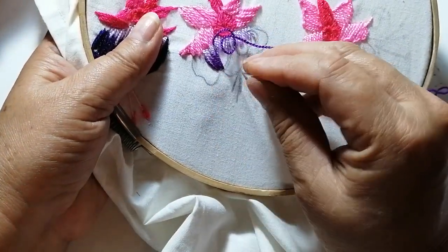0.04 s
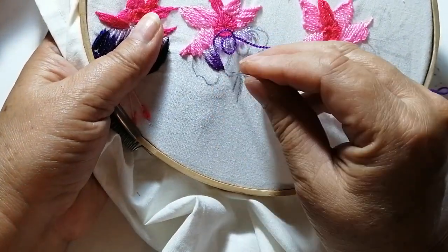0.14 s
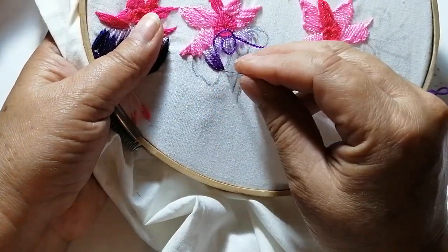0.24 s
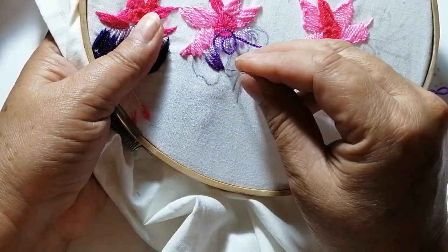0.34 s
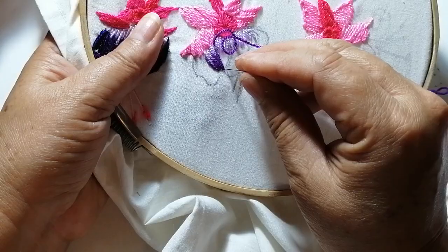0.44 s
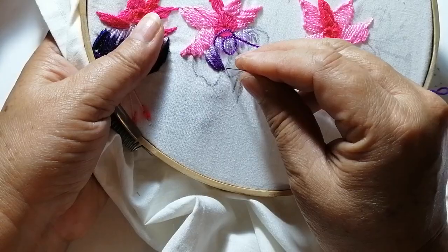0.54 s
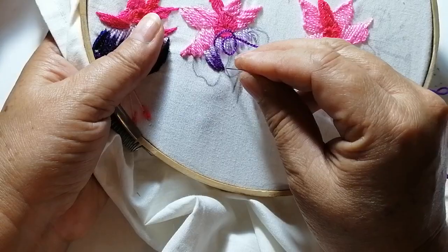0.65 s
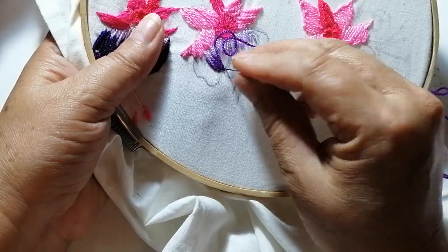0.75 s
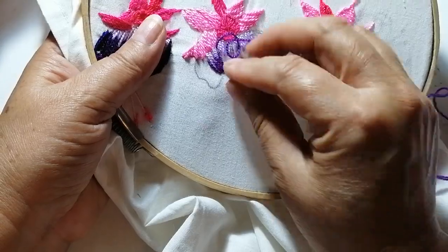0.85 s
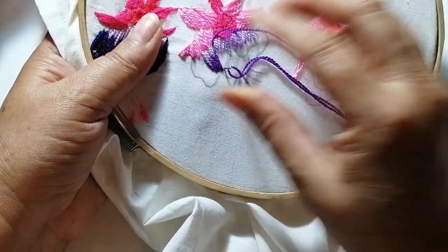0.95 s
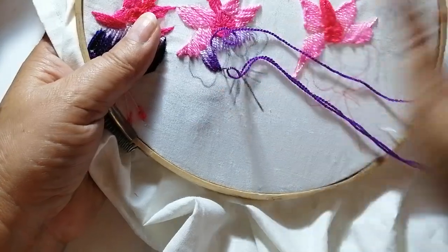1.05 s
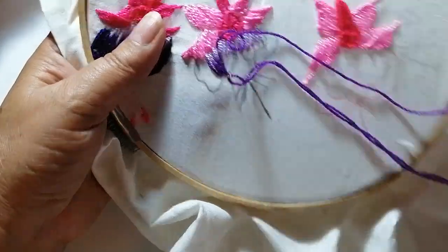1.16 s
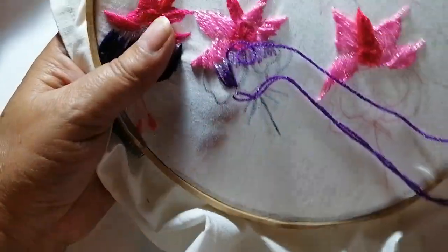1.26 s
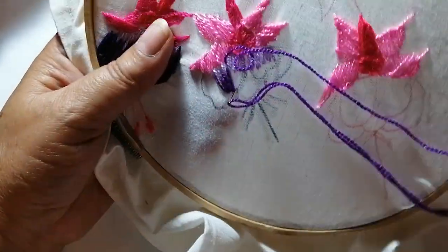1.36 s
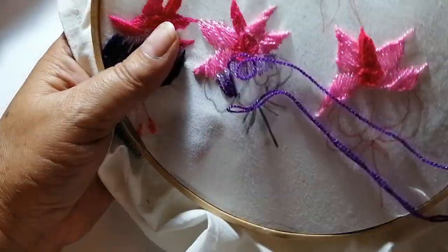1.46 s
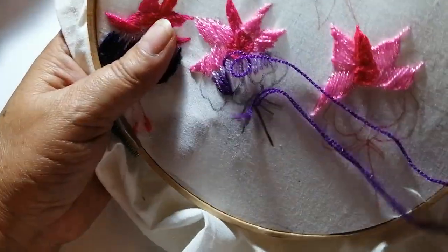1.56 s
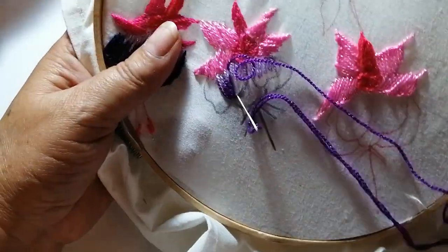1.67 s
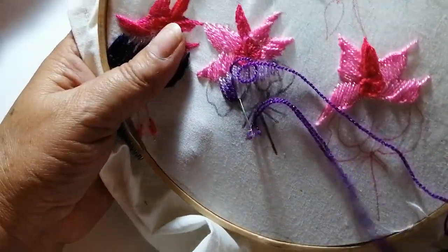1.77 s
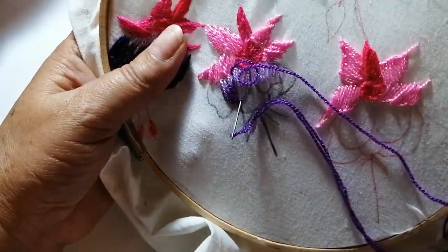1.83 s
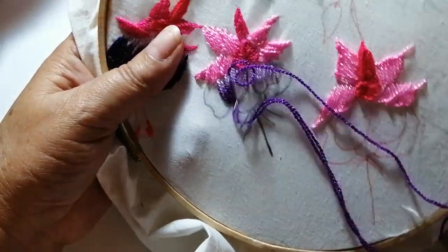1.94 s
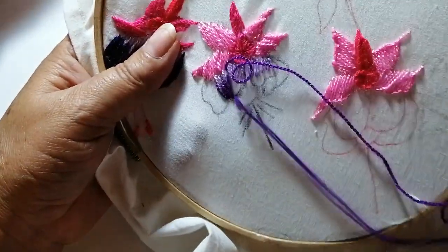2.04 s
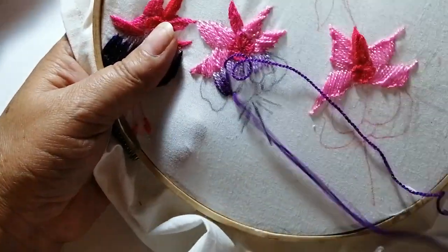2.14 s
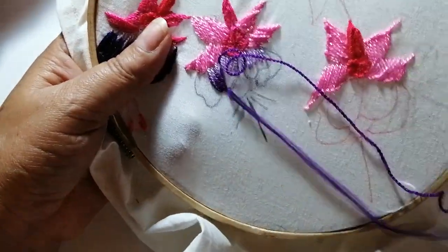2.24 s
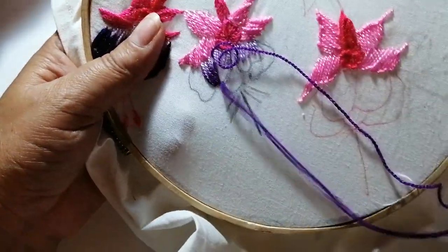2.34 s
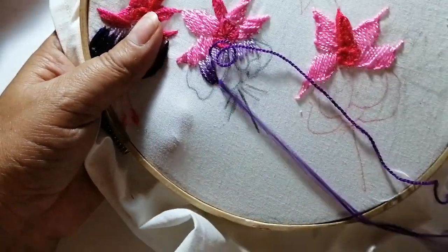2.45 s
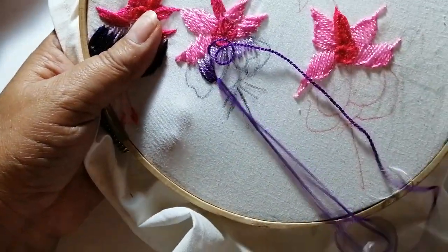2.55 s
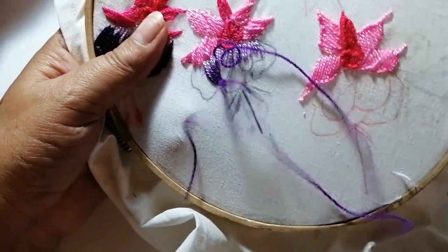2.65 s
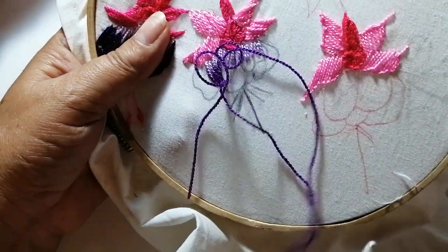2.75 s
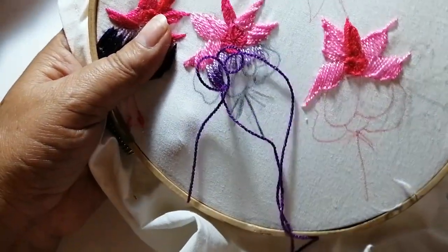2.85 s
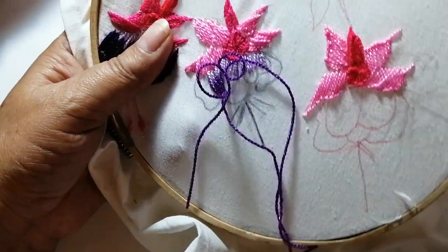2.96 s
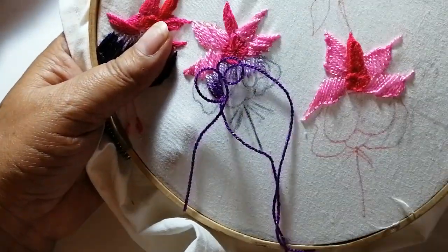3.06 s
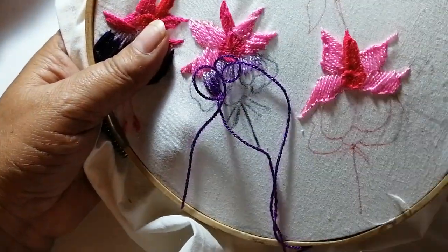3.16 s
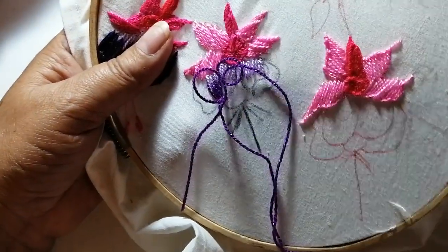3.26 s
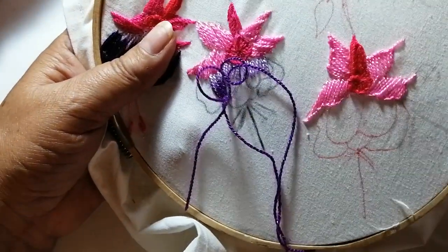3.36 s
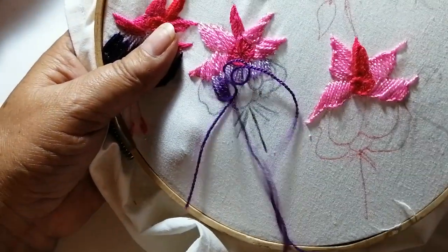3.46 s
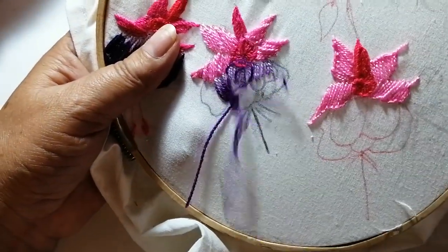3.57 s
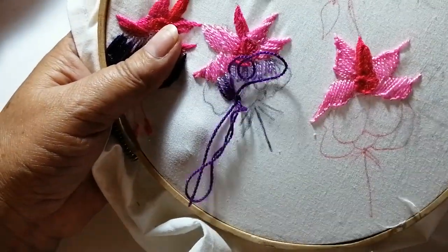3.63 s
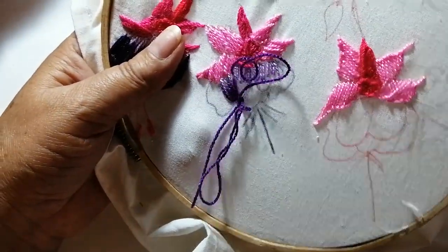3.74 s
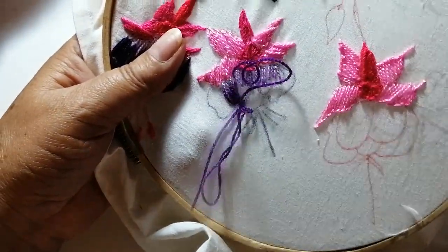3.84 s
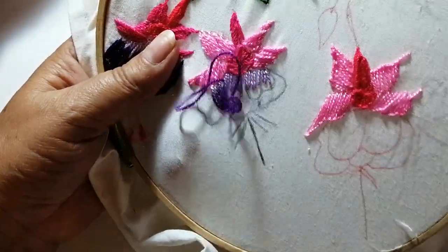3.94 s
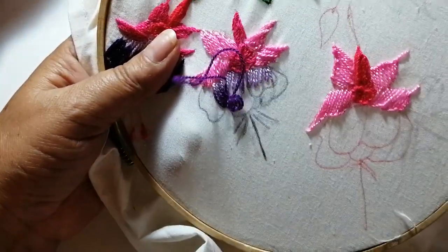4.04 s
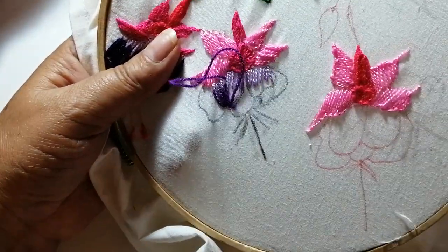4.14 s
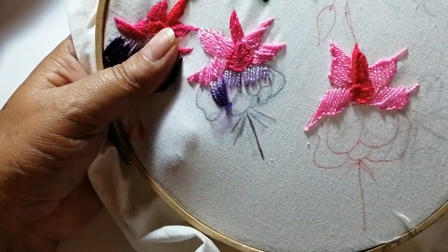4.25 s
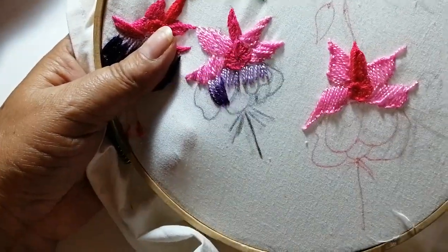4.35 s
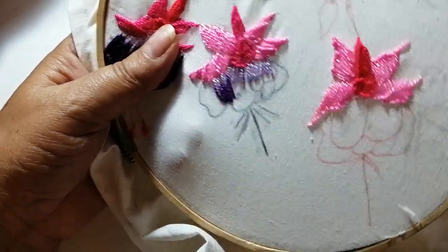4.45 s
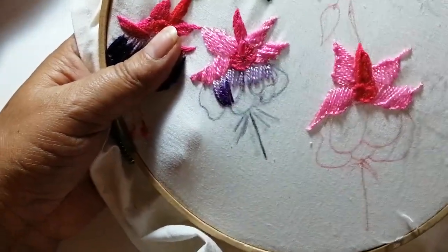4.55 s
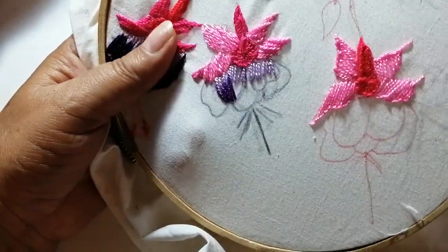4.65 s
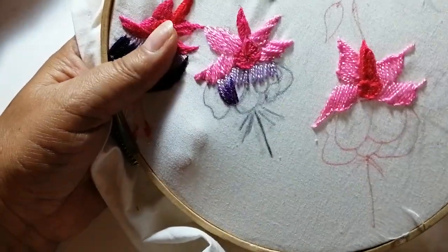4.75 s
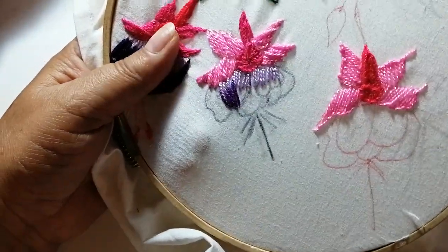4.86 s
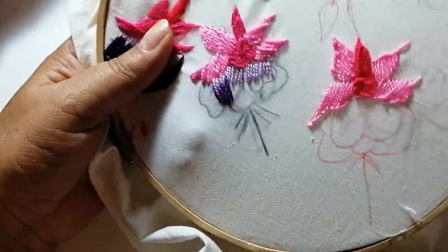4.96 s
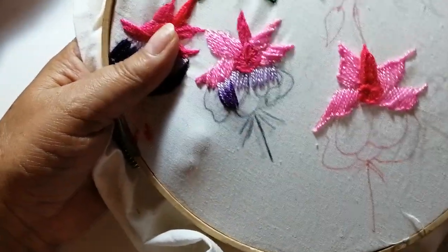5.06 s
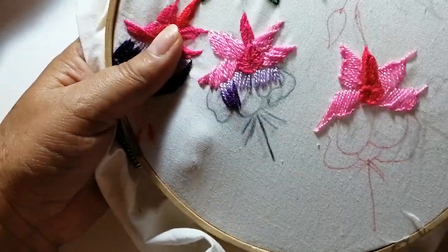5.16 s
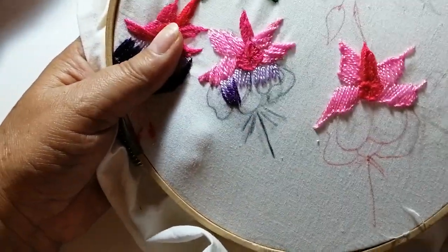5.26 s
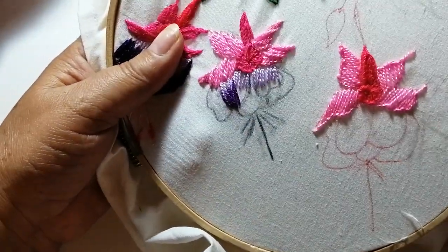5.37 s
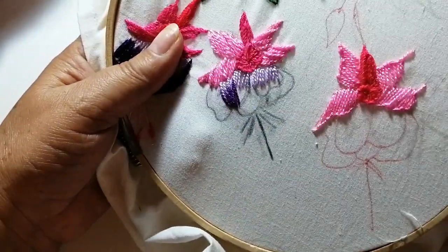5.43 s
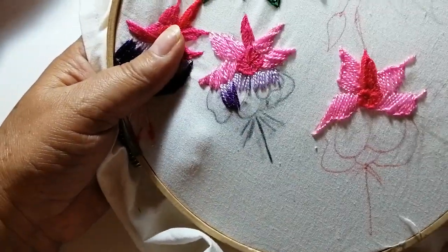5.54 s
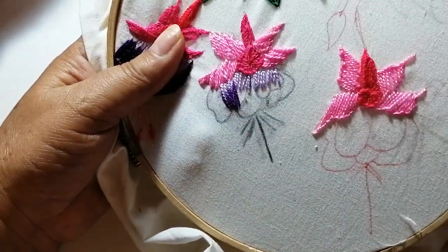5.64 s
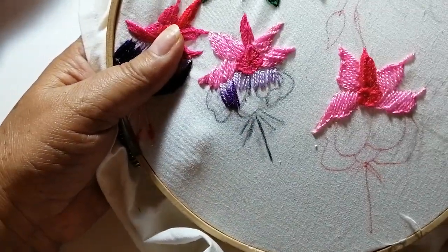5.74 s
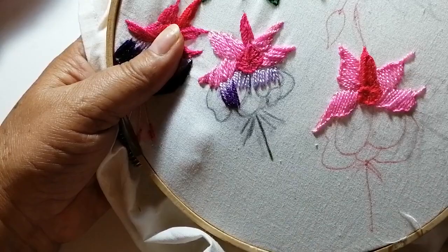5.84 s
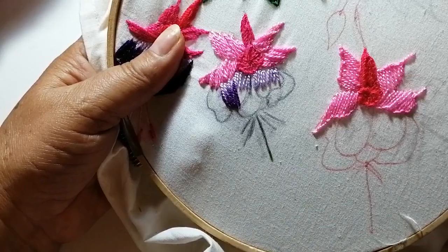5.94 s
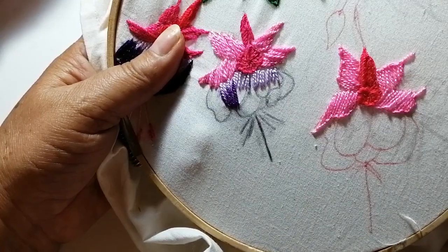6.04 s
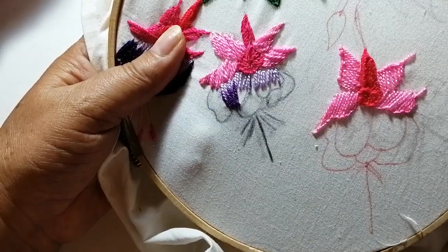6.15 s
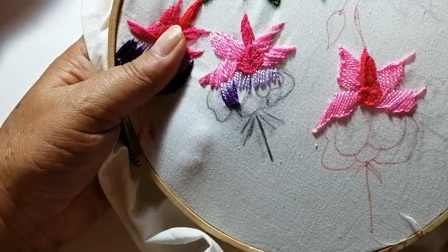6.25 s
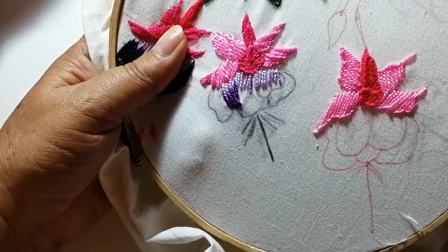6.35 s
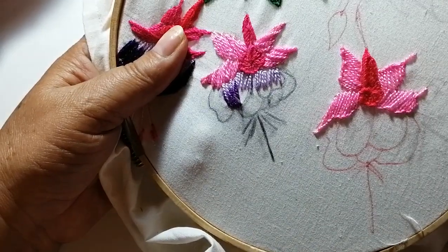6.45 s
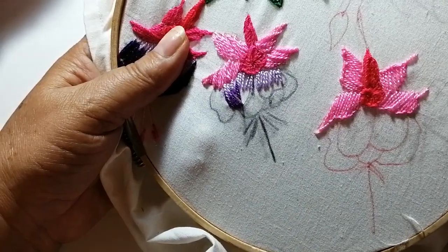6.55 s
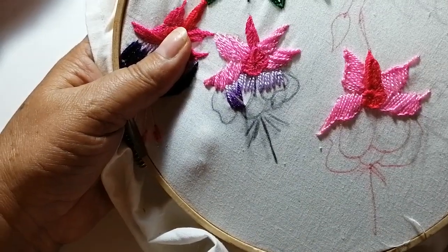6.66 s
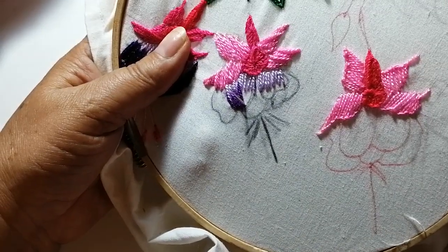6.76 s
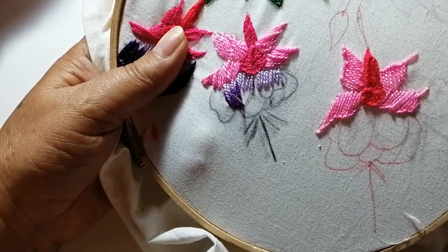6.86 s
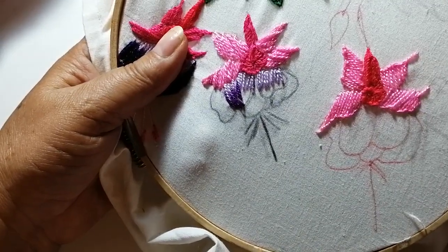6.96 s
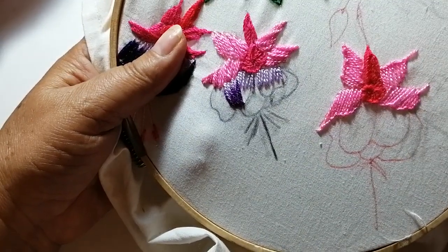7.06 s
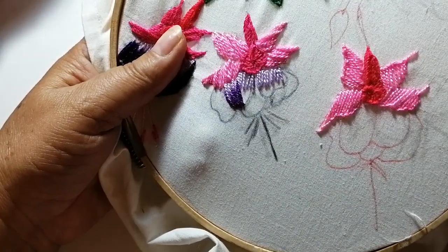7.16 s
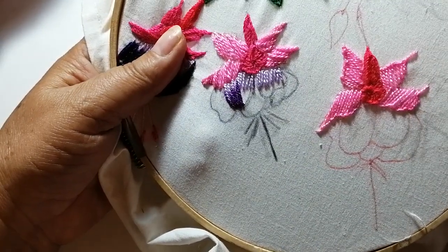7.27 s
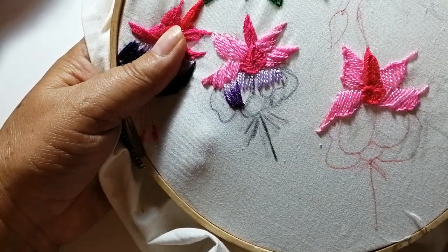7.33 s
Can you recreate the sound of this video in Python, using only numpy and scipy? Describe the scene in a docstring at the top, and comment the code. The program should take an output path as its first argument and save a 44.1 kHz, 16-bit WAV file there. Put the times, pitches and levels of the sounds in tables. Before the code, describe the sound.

Thread rasps through taut embroidery cloth in three pulls, with drum-like snaps and light needle pricks over a low hum.

```python
"""Close-up hand embroidery on cotton stretched in a hoop, over an appliance's low hum in a small room.
First fingers brush the cloth and the needle pricks it lightly. From 2 s the thread is drawn through in
three pulls, rasping as it slips; the taut cloth, a small drum, snaps when the needle's eye or a loop
pops through, hardest just before the third pull at 4.1 s. The fingers brush again, at 5.5 s the needle
pierces the weave, and one last prick leaves only the hum and the room."""
import sys
import numpy as np
from scipy import signal
from scipy.fft import rfft, irfft
from scipy.io import wavfile

SR = 44100
rng = np.random.default_rng(int(sys.argv[2]) if len(sys.argv) > 2 else 0)


def unload_audio(sound):
    """Save the sound as a 16-bit wav file, at the path given as the first command line argument."""
    columns = np.transpose(np.atleast_2d(sound))
    # keep every value between -1 and 1, then stretch to whole-number steps
    steps = np.round(np.clip(columns, -1, 1) * 32767)
    wavfile.write(sys.argv[1], SR, steps.astype(np.int16))


N = 326340
T = np.arange(N) / SR
HZ = np.fft.rfftfreq(N, 1 / SR)


# The arm speeds up, then eases off: (start [s], fastest [s], stop [s], top rasp [dB], build-up [dB],
# ease-off [dB], brightness [dB], brightening [dB/s], hoop tug [dB], slackening [dB/s], hiss [dB])
PULLS = [(2.008, 2.15, 2.684, -39, 4, 1.5, -.5, 2, -8.5, 38, -61.5),
         (3.470, 3.612, 3.728, -39.3, 12.5, 12.5, -8.5, 68, -8.5, 2, -62),
         (4.09, 4.26, 4.430, -49, 9, 2.5, 1.5, -5, -5, 40, -78.5)]
# How the thread sits in each pull: (rasp shelf edge [Hz], shelf gain [dB], ring in the hiss [dB])
THREAD_GRIPS = [(1300, 0, -13), (2195, -5.5, 10), (1650, -4.5, -11)]
# Tone of the slipping thread, the tugged hoop and the fibres: (frequency [Hz], level [dB])
RASP_EQ = [(100, -31), (250, -14.5), (400, -4), (470, -2.3), (680, 1.5), (900, -6), (1150, -10.5),
           (1420, -14), (1700, -18.5), (2200, -28), (3200, -32), (4500, -39), (9000, -53), (14000, -66)]
TUG_EQ = [(30, -29), (80, 2.5), (140, -8), (240, 2), (400, -3.5), (900, -59.5)]
FIBRE_EQ = [(800, -15.5), (2500, 3), (4000, -1.5), (5500, -0.5), (7000, -3.5), (8300, -5), (9600, 1.5),
            (11000, -4), (12500, -11.5), (15000, -18)]

def thread_pulls(attack_s=.027, release_s=.033, bright_hz=1100, trim_db=-1, room_db=-7,
                 hiss_build_db=7, hiss_sag=.8, hiss_linger_s=.012, hiss_release_s=.05):
    """Twisted thread slips through the weave and drives the cloth; its fibres hiss at the hole."""
    friction = tint(stick_slip(per_s=750, spread_db=3, smooth=.4), RASP_EQ) * amp(1.26 * drift(18))
    tug = tint(rng.standard_normal(N), TUG_EQ)
    fibres = tint(stereo(rng.standard_normal((2, N)), DIFFUSE_IMAGE), FIBRE_EQ) * amp(1.3 * drift(120))
    body, hiss = np.zeros(N), np.zeros((2, N))
    for pull, (edge_hz, shelf_db, ring_db) in zip(PULLS, THREAD_GRIPS):
        start, fastest, stop, db, build_db, ease_db = pull[:6]
        bright_db, brightening, tug_db, slackening, hiss_db = pull[6:]
        age, trip_ms = np.clip(T, start, stop) - start, round_trip_ms(fastest)
        slow = np.interp(T, [start, fastest], [1, 0])
        eased = np.interp(T, [fastest, stop], [0, 1])

        shelf = 1 + (amp(shelf_db) - 1) * (1 - lowpass(HZ, edge_hz, 16))
        rasp = unit(cloth(irfft(rfft(friction) * shelf, N), trip_ms))
        treble = irfft(rfft(rasp) * (1 - lowpass(HZ, bright_hz, 6)), N)
        rasp += (amp(bright_db + brightening * age) - 1) * treble
        drive = rasp + amp(tug_db - slackening * age) * tug
        moving = swell(start, attack_s, release_s, stop - start)
        body += moving * amp(db - build_db * slow - ease_db * eased) * drive

        # The loose end still hisses through the hole after the tension is gone.
        hissing = swell(start, attack_s, hiss_release_s, stop - start + hiss_linger_s)
        hiss_gain = amp(hiss_db - (build_db + hiss_build_db) * slow - hiss_sag * ease_db * eased)
        ringing = unit(np.array([cloth(side, trip_ms) for side in fibres]))
        hiss += hissing * hiss_gain * unit(fibres + amp(ring_db) * ringing)
    return amp(trim_db) * (close_mics(body) + amp(room_db) * room(body)) + hiss


# Snags letting go: (time [s], level [dB], sharpness [Hz], needle tick [dB], boom [dB], cloth ring [dB])
SNAPS = [(2.0220, -12.3, 2080, -35, -19, -8), (2.478, -35, 1000, -18, -30, -2),
         (3.544, -32, 900, -20, -33, 0), (3.5770, -30.5, 1000, -14, -16, -5),
         (3.6120, -28, 1420, -13, -32, -18), (3.6309, -18, 1700, -13, -25, -19),
         (3.9435, -7, 5000, -1.5, -19, -35), (4.0926, -28, 784, -19, -39, 1.5),
         (4.2563, -30, 1150, -6, -22, 5.5), (4.432, -44, 1500, -10, -30, -3)]

def thread_snaps():
    """The thread snags the cloth and pops free; a harder snap is wetter."""
    return sum(cloth_hit(s, db, sharp_hz, tick_db, boom_db, ring_db, room_db=-3.8 + .2 * db)
               for s, db, sharp_hz, tick_db, boom_db, ring_db in SNAPS)


# Needle touches: (time [s], level [dB], sharpness [Hz], needle tick [dB], cloth ring [dB])
PRICKS = [(0.7825, -56, 2500, -6, -20), (0.950, -57.5, 2000, -10, -12), (1.2178, -50.5, 1900, 18, -34),
          (5.0267, -53.5, 2000, 6, -3), (5.5243, -44.5, 3300, 3, -5.5), (5.8705, -31.8, 3300, 6, -7.5)]

def needle_pricks():
    """The point is too light to move the cloth far: thin ticks with hardly any low end."""
    return sum(cloth_hit(s, db, sharp_hz, tick_db, -42, ring_db, room_db=-5.5, low_cut_hz=350)
               for s, db, sharp_hz, tick_db, ring_db in PRICKS)


def needle_piercing(start_s=5.548, length_s=.053, jitter_s=.0006, strands=8):
    """The needle slips past strand after strand: faster, louder and sharper as it goes in."""
    depth = np.linspace(0, 1, strands) ** .8
    times = start_s + length_s * depth + jitter_s * rng.standard_normal(strands)
    return sum(cloth_hit(s, db=-43.5 + 5.5 * d, sharp_hz=2600, tick_db=4 + 8.5 * d,
                         boom_db=-24, ring_db=-9.5, room_db=-7.5) for s, d in zip(times, depth))


# Tone of one hit: (frequency [Hz], level [dB])
HIT_EQ = [(30, -38), (120, -10), (300, -0.5), (650, 5), (1300, -6.5), (2100, -12), (3200, -14.5),
          (4300, -22), (5800, -28), (7200, -27.5), (8300, -28.5), (9500, -20.5), (12000, -40),
          (15000, -50.5)]
# Low drum modes of the whole hoop: (frequency [Hz], level [dB], t60 [s])
DRUM_MODES = [(88, -2.5, 0.16), (162, -11, 0.16), (239.5, -3.5, 0.12), (349.7, -6.5, 0.14)]

def cloth_hit(s, db, sharp_hz, tick_db, boom_db, ring_db, room_db, low_cut_hz=0,
              size=16384, tick_s=.0006, ring_t60=.042):
    """One release kicks the cloth: a pulse with a gritty steel tick, a brief ring, a boom and reverb."""
    hz, t = np.fft.rfftfreq(size, 1 / SR), np.arange(size) / SR
    trip_ms = round_trip_ms(s)
    colour = amp(read(HIT_EQ, hz)) / np.sqrt(1 + (low_cut_hz / (hz + 1)) ** 6)
    soft = lowpass(hz, sharp_hz, 8)  # crossover: pulse below, tick above
    pulse = impulse(colour * np.sqrt(soft))
    click = impulse(colour * np.sqrt(1 - soft) * hz / (hz + 1500))
    grit = rng.standard_normal(size) * np.exp(-t / tick_s)
    tick = signal.fftconvolve(click, grit / np.linalg.norm(grit))[:size]
    hit = cloth(pulse + amp(tick_db) * tick, trip_ms)
    hit /= abs(hit).max()

    onset = 1 - np.exp(-(t / .003) ** 2)  # the modes take a moment to build up
    ring_hz = 3500 / trip_ms  # three and a half cycles a round trip
    ring = amp(ring_db - 60 * t / ring_t60) * np.cos(2 * np.pi * ring_hz * t)
    boom = sum(amp(level - 60 * t / t60) * np.cos(2 * np.pi * f * t) for f, level, t60 in DRUM_MODES)
    direct = hit + onset * (ring + amp(boom_db) * boom)
    fader = amp(db) * np.minimum(np.linspace(10, 0, size), 1)
    return close_mics(place(s, fader * direct)) + place(s, fader * amp(room_db) * room(hit))


# How much of a wave the hoop sends back: (frequency [Hz], share [0-1])
RIM_REFLECTION = [(100, 0.4), (280, 0.1), (470, 0.57), (670, 0.53), (900, 0.33), (1400, 0), (2500, 0.14)]
# Narrow resonances of hoop and needle: (frequency [Hz], width [Hz], boost [dB])
RESONANCES = [(1380, 110, 6), (1934, 77, 6), (2760, 256, 6.5), (3680, 150, 6.5), (7020, 750, 7.5),
              (9500, 1300, 3)]

def cloth(x, trip_ms):
    """Waves cross the cloth and return inverted, again and again: a hollow comb with narrow rings."""
    hz = np.fft.rfftfreq(len(x), 1 / SR)
    returned = np.clip(read(RIM_REFLECTION, hz), 0, .9) * np.exp(-2j * np.pi * hz * trip_ms / 1000)
    peaks = [1 + (amp(db) - 1) / (1 + 2j * (hz - f) / width) for f, width, db in RESONANCES]
    return irfft(rfft(x) * np.prod(peaks, axis=0) / (1 + returned), len(x))


# How taut the cloth is held: (time [s], wave round trip [ms])
TAUTNESS = [(2.3, 5.33), (3.9, 5.33), (4.2, 5.0), (5.6, 5.0), (5.87, 5.2)]

def round_trip_ms(s):
    """A wave's trip across the cloth and back at time s; tauter is quicker."""
    return np.interp(s, *np.transpose(TAUTNESS))


# Strokes over the cloth: (crest [s], 20 dB rise [s], 20 dB fall [s], level [dB])
STROKES = [(0.87, .15, .3, -78), (1.105, .07, .24, -73), (1.53, .11, .22, -68), (1.94, .5, 0.9, -78),
           (3.345, .075, .18, -65.5), (3.895, .2, 0.2, -78), (4.768, .16, .27, -75),
           (5.028, .015, 0.1, -75), (5.345, .2, .11, -71.5), (5.60, 0.11, .04, -67)]
# Tone of skin on cloth: (frequency [Hz], level [dB])
BRUSH_EQ = [(150, -9.5), (420, 4.5), (800, 5), (1500, -1), (2600, 5), (4200, -2), (6500, -1), (8300, -5),
            (10300, -1), (12500, -11.5), (15000, -33)]

def finger_brushes(trim_db=4):
    """Skin and loose thread brush the weave in soft, grainy swells."""
    grain = np.array([stick_slip(per_s=1200, spread_db=5, smooth=1.2) for _ in range(2)])
    envelope = sum(amp(db) * swell(s, rise, fall) for s, rise, fall, db in STROKES)
    return amp(trim_db) * envelope * tint(stereo(grain, DIFFUSE_IMAGE), BRUSH_EQ)


# Short cloth rustles: (time [s], length [s], level [dB])
RUSTLES = [(0.77, 0.23, -69), (1.413, .26, -73), (1.915, .07, -71), (3.29, 0.18, -61.5), (3.73, 0.16, -68),
           (3.95, .12, -49), (5.364, 0.15, -70.5), (5.534, 0.074, -57.5)]

def cloth_rustles(room_db=-1.5):
    """The cloth creases and rustles, loudest as it shakes just after the hardest snap."""
    envelope = sum(place(s, amp(db) * signal.windows.tukey(round(length * SR), .8))
                   for s, length, db in RUSTLES)
    creases = stick_slip(per_s=400, spread_db=4.5, smooth=.6)
    rustle = envelope * unit(cloth(tint(creases, RASP_EQ), trip_ms=3.7))
    return rustle + amp(room_db) * room(rustle)


# Soft bumps: (time [s], level [dB], pitch [Hz], attack [s], t60 [s])
NUDGES = [(3.316, -35.5, 639, 0.0062, 0.06), (5.009, -38, 79, 0.0057, 0.19)]

def fingertip_nudges():
    """A soft fingertip sets one mode swinging, without any click."""
    out, t = np.zeros(N), np.arange(SR // 2) / SR
    for s, db, hz, attack, t60 in NUDGES:
        envelope = amp(db - 60 * t / t60) * (1 - np.exp(-(t / attack) ** 2))
        out += place(s, envelope * np.sin(2 * np.pi * hz * t))
    return out


# Fainter tones above the motors' drone: (frequency [Hz], level [dB])
HUM_TONES = [(209.9, -71.5), (355.3, -83.5), (414.5, -77.5)]
# The second motor's fader, relative to the first: (time [s], level [dB])
SECOND_MOTOR = [(0, -1.5), (3.1, -1.5), (4.2, -12), (7.4, -9)]

def appliance_hum(motor_hz=119, motor_db=-66.7, beat_s=.695, crest_s=.165, waver_db=1.76, wander_rad=.12):
    """Two motors, almost in tune, beat slowly under fainter wavering tones."""
    phase = 2 * np.pi * motor_hz * T + wander_rad * drift(7.4)
    beat = 2 * np.pi * (T - crest_s) / beat_s
    second_gain = amp(np.interp(T, *np.transpose(SECOND_MOTOR)))
    drone = amp(motor_db) * (np.sin(phase) + second_gain * np.sin(phase - beat))
    tones = sum(amp(db + waver_db * drift(4)) * np.sin(2 * np.pi * hz * T + wander_rad * drift(5))
                for hz, db in HUM_TONES)
    return np.sqrt(2) * (drone + tones)


# Stereo image of reverb, hiss and brushing: (frequency [Hz], left-right correlation [-1 to 1])
DIFFUSE_IMAGE = [(100, 0.64), (600, 0.89), (1400, 0.09), (3000, -0.22), (7000, -0.21)]
# Reverb decay: (frequency [Hz], t60 [s])
REVERB_T60 = [(100, .35), (400, 0.2), (1000, 0.26), (2800, 0.3), (7500, 0.3), (14000, 0.41)]
# Reverb tone: (frequency [Hz], level [dB])
REVERB_EQ = [(80, 2), (400, 1), (900, -2), (2000, -3.5), (4000, -7.5), (10000, -5.5)]

def room(x, rise_s=.0065):
    """Small-room reverb: dense reflections, each band dying at its own speed."""
    noise = stereo(rng.standard_normal((2, SR // 2)), DIFFUSE_IMAGE)
    hz, t, bands = signal.stft(noise, SR, nperseg=256)
    bands *= amp(read(REVERB_EQ, hz)[:, None] - 60 * t / read(REVERB_T60, hz)[:, None])
    tail = signal.istft(bands, SR, nperseg=256)[1]
    tail *= 1 - np.exp(-(np.arange(tail.shape[1]) / SR / rise_s) ** 2)
    return signal.fftconvolve(x[None], tail / np.linalg.norm(tail[0]), axes=1)[:, :len(x)]


# Colour of the room tone: (frequency [Hz], level [dB])
AIR_EQ = [(20, -1), (60, -5.5), (110, -7.5), (200, -9), (300, -13.5), (430, -16), (560, -18.5), (1000, -22),
          (2000, -26), (4000, -31.5), (7000, -36), (8300, -43), (9600, -42), (14500, -48)]
# Its stereo image: (frequency [Hz], left-right correlation [-1 to 1])
AIR_IMAGE = [(30, 0.21), (200, 0.025), (600, 0.39), (1400, 0), (3000, 0.18), (12000, 0)]

def room_tone(db=-64.5):
    """The quiet room's steady bed of dark, wide noise."""
    return amp(db) * tint(stereo(rng.standard_normal((2, N)), AIR_IMAGE), AIR_EQ)


def stick_slip(per_s, spread_db, smooth):
    """Tiny releases of uneven size over a bed of smooth friction."""
    size = amp(spread_db * np.clip(rng.standard_normal(N), -2, 2))
    clicks = size * (rng.random(N) < per_s / SR)
    return unit(unit(clicks - clicks.mean()) + smooth * rng.standard_normal(N))


def close_mics(x, lean_db=.5, treble_lean_db=.6, lead_rad=1.5, treble_hz=3300):
    """A near sound reaches the left microphone a little sooner and, most of all in the treble, louder."""
    treble = np.tanh(np.fft.rfftfreq(len(x), 1 / SR) / treble_hz)
    left = amp(lean_db + treble_lean_db * treble)
    right = np.exp(-1j * lead_rad * treble) / left
    return irfft(rfft(x) * np.array([left, right]), len(x))


def stereo(two, image):
    """Makes two unrelated signals partly alike, band by band."""
    a, b = rfft(two)
    same = np.clip(read(image, np.fft.rfftfreq(two.shape[1], 1 / SR)), -1, 1)
    return irfft(np.array([a, same * a + np.sqrt(1 - same ** 2) * b]), two.shape[1])


def swell(s, rise, fall, hold=0):
    """Envelope that climbs to 1 at time s, holds and dies; rise and fall are seconds per 20 dB."""
    return 10 ** (np.minimum(T - s, 0) / rise - np.maximum(T - s - hold, 0) / fall)


def drift(rate_hz):
    """Smooth random modulation at rms 1."""
    return unit(irfft(rfft(rng.standard_normal(N)) * np.exp(-(HZ / rate_hz) ** 2), N))


def impulse(gain):
    """The tightest (minimum-phase) impulse with this spectrum."""
    log_gain = np.log(np.maximum(gain, 1e-5))
    mirrored = np.concatenate([log_gain, log_gain[-2:0:-1]])
    return np.fft.ifft(np.exp(np.conj(signal.hilbert(mirrored)))).real


def lowpass(hz, edge_hz, steepness):
    """Roll-off curve from 1 to 0, halfway at the edge."""
    return 1 / (1 + (hz / edge_hz) ** steepness)


def tint(x, eq):
    """Applies an EQ curve and scales to rms 1."""
    return unit(irfft(rfft(x) * amp(read(eq, HZ)), N))


def read(curve, hz):
    """Reads a curve on a log-frequency axis."""
    f, value = np.transpose(curve)
    return np.interp(np.log(hz + 1), np.log(f + 1), value)


def place(s, sound):
    """Lays a sound on an empty track at time s."""
    track = np.zeros(sound.shape[:-1] + (N,))
    slot = track[..., round(s * SR):][..., :sound.shape[-1]]
    slot += sound[..., :slot.shape[-1]]
    return track


def amp(db):
    """Decibels to gain."""
    return 10 ** (np.asarray(db) / 20)


def unit(x):
    """Scales to rms 1."""
    return x / np.sqrt(np.mean(x ** 2) + 1e-20)


def scene():
    """Thread and needle up front, fingers and rustles under them, hum and room tone behind."""
    stitching = thread_snaps() + needle_pricks() + needle_piercing() + thread_pulls()
    texture = finger_brushes() + cloth_rustles() + fingertip_nudges()
    return stitching + texture + appliance_hum() + room_tone()


def record(dry, cutoff_hz=15250):
    """A steep high cut on the whole mix."""
    high_cut = signal.firwin(511, cutoff_hz, window=("kaiser", 9), fs=SR)
    return signal.oaconvolve(dry, high_cut[None], "same")


dry = scene()
out = record(dry)
unload_audio(out)
```